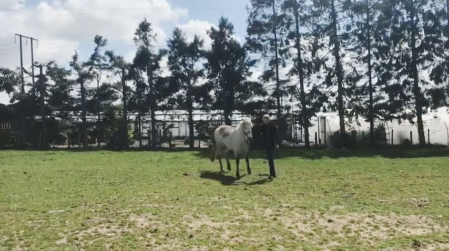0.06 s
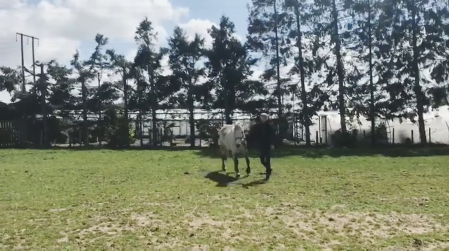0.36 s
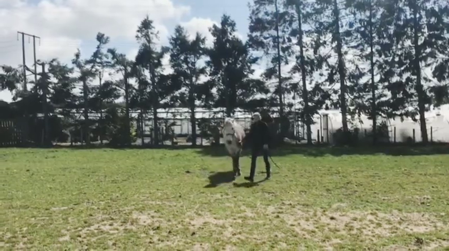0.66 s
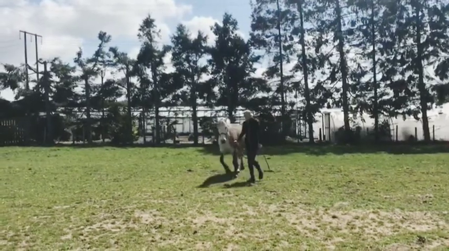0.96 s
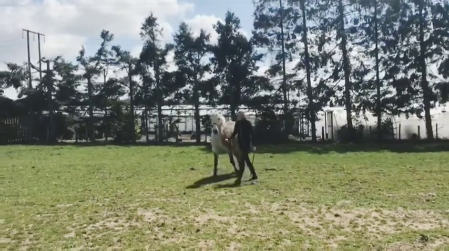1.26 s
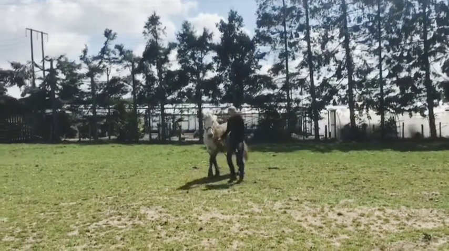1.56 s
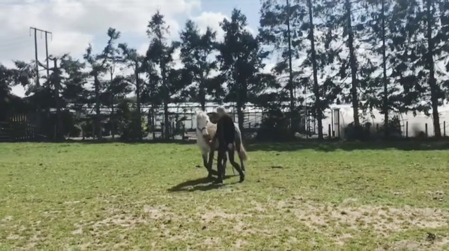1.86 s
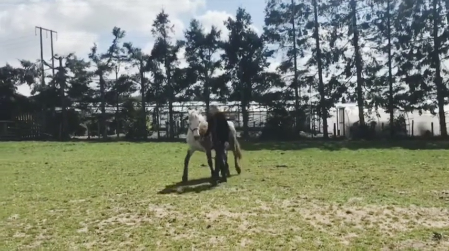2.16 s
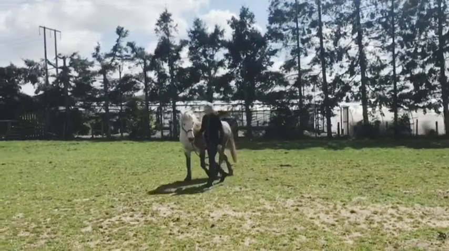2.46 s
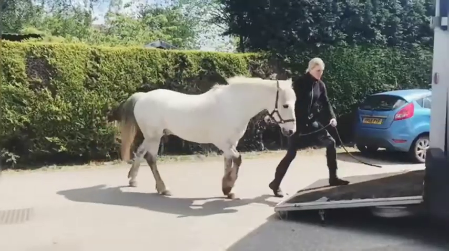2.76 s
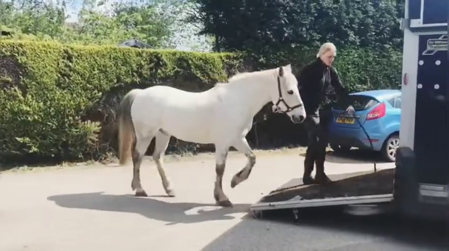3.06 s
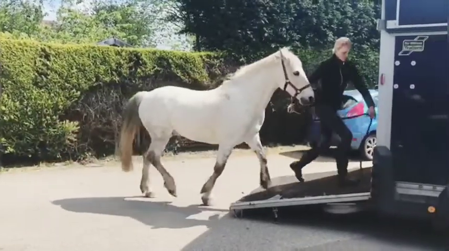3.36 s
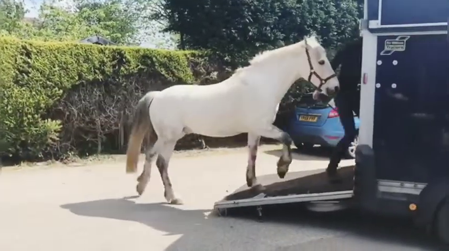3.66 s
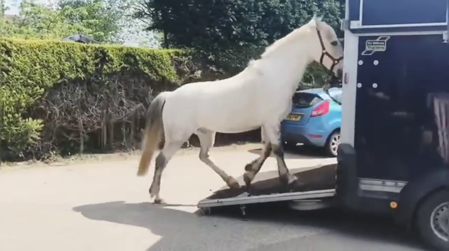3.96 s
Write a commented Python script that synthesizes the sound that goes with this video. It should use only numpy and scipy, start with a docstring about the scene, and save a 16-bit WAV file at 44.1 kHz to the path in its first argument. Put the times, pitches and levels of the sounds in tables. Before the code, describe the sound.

A horse's hooves clop across a hard yard, then thud loudly onto a hollow, rattling trailer ramp near the microphone while small birds chirp. Before that, a finch sings over a quiet field and a distant animal hoots faintly.

```python
"""A finch sings over a quiet field while an animal hoots far off; a first soft footfall sounds. After a brief
gap the scene changes: the microphone stands in a yard with two more songbirds. A led horse clops over hard
ground, then sets its front hooves on a trailer ramp. Each blow rings the ramp's panel, makes the box behind it
boom and sets hinges and fittings rattling."""
import sys
import numpy as np
from scipy import signal
from scipy.fft import rfft, irfft
from scipy.io import wavfile
from scipy.ndimage import uniform_filter1d

SR = 44100
rng = np.random.default_rng(int(sys.argv[2]) if len(sys.argv) > 2 else 0)


def inscribe(sig):
    """Save sig as 16-bit PCM at rate SR to the path in sys.argv[1].

    A 1-D sig is mono; a 2-D sig holds one channel per row.
    Samples are clipped to [-1, 1] before scaling.
    """
    pcm = np.round(np.clip(np.atleast_2d(sig).T, -1, 1) * 32767)
    wavfile.write(sys.argv[1], SR, pcm.astype(np.int16))


N = 176400
T = np.arange(N) / SR
RING_T = T[:SR]  # one second for a blow to die away

# Noisy decays. Each row: frequency in Hz, relative level in dB, t60 in seconds.
CRACK = [(300, 4.5, 0.025), (1510, 10.5, 0.03), (2350, -6.5, 0.071), (3960, 0.5, 0.046), (7400, -14, 0.021),
         (11700, -25.5, .025)]  # a hard hit on the ramp or its fittings
TRAILER = [(99, 8, 0.25), (250, -7.5, 0.58), (448, -0.5, 0.7), (1290, -2.5, 0.32), (4520, 3.5, 0.29)]  # reverberation inside the trailer
TREES = [(400, 7, 0.13), (2480, 3, 0.75), (4100, -2.5, 0.65), (8700, 5.5, 0.56)]  # reflections from the trees


def ramp(crunch_db=4, thump_t60_s=0.037):
    """Each step flexes the ramp with a thump and rings the panel and the box; the trailer reverberates."""
    # Each row: start in seconds, levels of boom, panel, crack and thump in dB, thump pitch in Hz.
    blows = [(2.779, -55, -46, -41.5, -24.5, 127), (2.826, -37, -52, -62, -30, 71.6),
             (3.349, -18, -18, -24, -14.5, 232), (3.389, -40, -17.5, -24.5, -7, 254),
             (3.882, -46, -28.5, -24.5, -30, 298), (3.886, -24.5, -22.5, -39, -22, 261),
             (3.898, -16, -19.5, -16.5, -14, 258), (3.922, -22, -18, -42, -22, 188),
             (3.973, -20, -29, -44, -15, 161)]
    # Modes of the ramp and the trailer's box. Each row: frequency in Hz, level in dB, t60 in seconds.
    panel_modes = [(137.3, -9.5, 0.26), (170.4, -8.5, 0.16), (199.7, -4.5, 0.18), (224.4, 1, 0.18),
                   (251, -2, 0.19), (289, -12, 0.29), (346.6, -10, 0.14), (581, -17, 0.3)]
    box_modes = [(50.17, -11.5, 1), (56.6, -5.5, 0.9), (78.7, -14, 1), (126.7, -13.5, 0.91)]
    hits, low = np.zeros(N), np.zeros(N)
    for start, boom_db, panel_db, crack_db, thump_db, thump_hz in blows:
        boom = amp(boom_db) * ring(box_modes, scatter=0.0079)
        thump = ring([(thump_hz, thump_db, thump_t60_s)])
        add(low, start, (boom + thump) * loading(rise_s=0.0057))
        panel = amp(panel_db) * ring(panel_modes) * loading(rise_s=0.0036)
        crack = amp(crack_db) * decay(CRACK) * amp(crunch_db * walk(730, SR))
        add(hits, start, panel + crack)
    return low + echo(hits, TRAILER, wet_db=-2)


def fittings(width_octaves=0.59, knock_t60_s=0.021, board_db=-20.5, board_t60_s=0.15, crack_db=-13.5):
    """Loose hinges and fittings knock; every knock rings the boards in its own mix of modes."""
    # Each row: start in seconds, level in dB, centre of the knock in Hz.
    rattles = [(3.351, -16, 930), (3.368, -18.5, 1150), (3.391, -19, 790), (3.404, -18, 1390),
               (3.413, -25, 1140), (3.424, -18.5, 1290), (3.437, -18.5, 1390), (3.456, -24, 1350),
               (3.887, -12, 980), (3.894, -18, 1050), (3.9124, -15, 1370), (3.918, -16.5, 1460),
               (3.930, -17, 1190), (3.948, -19.5, 1240), (3.956, -21, 930)]
    # The boards' mode frequencies in Hz.
    board_modes = [616, 649, 765, 1030, 1155, 1300, 1465, 1630, 1736, 1870]
    out, octave = np.zeros(N), log_hz(SR)
    for start, db, centre_hz in rattles:
        band = np.exp(-((octave - np.log2(centre_hz)) / width_octaves) ** 2)
        knock = irfft(rfft(rng.standard_normal(SR)) * band, SR)
        knock = knock / knock.std() * fade(knock_t60_s)
        wood = sum(rng.standard_normal() * ring([(hz, board_db, board_t60_s)], scatter=.004)
                   for hz in board_modes)
        add(out, start, amp(db) * (knock + wood + amp(crack_db) * decay(CRACK)))
    return echo(out, TRAILER, wet_db=-8.5)


def ground_steps(grain_db=4, crunch_db=4, hollow_low_hz=600):
    """Each contact crunches, rings the hollow hoof and thuds; dragged feet grind grit; the yard echoes."""
    # Hooves and boots. Each row: start in seconds, hollow pitch in Hz, clop, crack and thud in dB.
    contacts = [(2.34, 712, -36.5, -56.5, -50), (2.599, 912, -25, -36.5, -29),
                (2.777, 1804, -39, -44, -31.5), (2.882, 656, -40.5, -51, -63),
                (2.975, 835, -29.5, -24, -26.5), (2.98, 860, -29, -23, -64), (2.996, 716, -17, -14.5, -29),
                (3.005, 753, -14, -33, -40), (3.588, 752, -27, -46, -34), (3.718, 649.4, -17.5, -56, -31.5)]
    # The hoof capsule's modes. Each row: ratio to the hollow pitch, level in dB, t60 in seconds.
    hoof_modes = [(1, 0, 0.034), (1.2, -8.5, .03), (1.48, -10, .025), (2.1, -20, 0.045)]
    # Struck ground and the yard's echo. Each row: frequency in Hz, relative level in dB, t60 in seconds.
    crack_bands = [(455, -12, 0.031), (830, 1, 0.03), (1700, 6.5, 0.026), (2740, -6, 0.026),
                   (4250, 1.5, 0.028), (7700, -5.5, 0.032), (10900, -19.5, 0.026)]
    thud_bands = [(50, -3, 0.06), (129.8, -4, 0.17), (281, 10.5, 0.042), (440, -12.5, 0.1),
                  (1500, -30.5, 0.037)]
    yard_echo = [(151, -2.5, 0.53), (442, 3, 0.41), (870, 5, 0.28), (4940, -4.5, 0.29)]
    # Dragged feet. Each row: start in seconds, length in seconds, level in dB.
    scuffs = [(2.68, 0.046, -53.5), (3.276, 0.062, -37), (3.338, 0.11, -31), (3.708, 0.066, -36.5)]
    # Grinding grit. Each row: frequency in Hz, relative level in dB.
    grit_colour = [(450, -1), (900, 2.5), (2500, -11.5), (7500, -23), (11500, -35)]
    ground, clops = np.zeros(N), np.zeros(N)
    for start, hz, clop_db, crack_db, thud_db in contacts:
        add(clops, start, amp(clop_db) * ring([(hz * ratio, db, t60) for ratio, db, t60 in hoof_modes]))
        crack = amp(crack_db) * decay(crack_bands) * amp(crunch_db * walk(760, SR))
        thud = amp(thud_db) * decay(thud_bands)
        add(ground, start, loading(rise_s=0.002) * (crack + thud))
    for start, length, db in scuffs:
        drag = loading(rise_s=0.0053) * np.exp(-2 * (RING_T / length) ** 2)
        grit = noise(grit_colour, SR) * amp(grain_db * walk(574, SR))
        add(ground, start, amp(db) * drag * grit)
    clops = signal.sosfilt(signal.butter(3, hollow_low_hz, "high", fs=SR, output="sos"), clops)
    return echo(ground, yard_echo, wet_db=-9) + echo(clops, yard_echo, wet_db=-17)


def finch(clear=0.027, trilled=0.045, buzzy=0.11):
    """Slurs, a trill, an arched note and a buzzy ending whose last low note lingers in the trees."""
    # Syllable shapes. Each row: time in milliseconds, pitch in Hz, relative level in dB.
    slur = [(0, 7200, -24.5), (18.17, 6000, -6), (30.3, 5400, -16), (31.7, 3900, -30), (34.8, 2950, -15),
            (46.7, 3150, -12.5), (52, 3600, 6.5), (58.7, 5200, -20), (73.3, 4100, 3.5), (83.1, 3160, -10.5)]
    trill = [(0, 4700, -12), (6.8, 4400, -9), (11.96, 3500, -7), (19.97, 6300, -15), (26.6, 3400, -8),
             (30.77, 3710, 2), (37.6, 2650, -16.5), (44.8, 2800, -12), (51.7, 3030, -20)]
    arch = [(0, 2600, -19), (20.3, 3350, -6), (35.4, 3650, -2), (50.6, 3640, -4.5), (65.9, 3000, -5.5),
            (86, 2500, -21)]
    flick = [(0, 7500, -10), (5.04, 5600, -7.5), (12.1, 6700, -19), (19.8, 5800, -7), (37.8, 4100, -8),
             (42.3, 2900, -15)]
    rasp = [(0, 3600, -12.5), (24.8, 4100, -1.5), (53.4, 4100, -2.5)]
    fall = [(0, 2900, -17), (8.3, 3700, -1), (22.3, 3400, -3.5), (33.1, 3050, -2), (42, 2700, -18)]
    low_note = [(0, 2600, -0.18), (42.3, 2280, -2)]
    # When each shape is sung. Each row: start in seconds, level in dB.
    slurs = [(-.074, -40), (0.086, -41.5), (0.248, -39.5)]
    trills = [(.417, -36), (.505, -35.5), (0.593, -39), (0.686, -39.5), (.775, -38.5), (.863, -38.5),
              (.950, -39), (1.039, -39), (1.130, -39.5)]
    arches = [(1.241, -30)]
    flicks = [(1.426, -41), (1.514, -41.5), (1.602, -39.5)]
    rasps = [(1.70, -44)]
    falls = [(1.755, -42)]
    low_notes = [(1.796, -61)]
    song = sing(slur, slurs, warble=clear)
    song += sing(trill, trills, warble=trilled, sag_per_s=0.0357)
    song += sing(flick, flicks, warble=buzzy, blur_db=-3)
    song += sing(rasp, rasps, warble=buzzy)
    song += sing(fall, falls, warble=trilled)
    arched = sing(arch, arches, warble=0.011, blur_db=-16)
    song = echo(song, TREES, wet_db=-2.5) + echo(arched, TREES, wet_db=-11)
    return song + echo(sing(low_note, low_notes, warble=trilled), TREES, wet_db=9)


def hedge_birds():
    """One bird twitters into a sinking whistle; another repeats a double chip; a thin note sounds high."""
    # Syllable shapes. Each row: time in milliseconds, pitch in Hz, relative level in dB.
    twitter = [(0, 5000, -3.5), (12.84, 3400, -11), (20.8, 5400, -1.5), (30, 3200, -13), (42.2, 4700, -1),
               (48, 5200, -9), (59.2, 4300, -10)]
    whistle = [(0, 4660, -18), (15, 4630, -6), (32, 4570, 0), (58, 4470, -8), (68, 4420, -24)]
    chip = [(0, 3400, -12), (7.94, 3750, -2.5), (17.3, 3250, -13), (28.3, 3800, -0.5), (36.06, 3400, -6),
            (46.15, 2850, -8.5), (67.5, 1900, -36), (85.3, 2550, -10.5), (95.7, 2900, -6.5),
            (101.5, 2970, -2), (110.4, 2880, -26)]
    thin_note = [(0, 7500, -2), (115, 7280, -2)]
    # When each shape is sung. Each row: start in seconds, level in dB.
    twitters = [(2.528, -49), (2.728, -44.5), (2.92, -41.5)]
    whistles = [(2.593, -41), (2.786, -36), (2.981, -41.5)]
    chips = [(3.096, -37.5), (3.243, -40), (3.53, -38.5), (3.675, -38), (3.825, -36.5)]
    thin_notes = [(3.124, -62)]
    song = sing(twitter, twitters, warble=0.06, blur_db=1)
    song += sing(whistle, whistles, warble=0.004, blur_db=-15, scatter=0.0021)
    song += sing(chip, chips, warble=0.027, blur_db=-5.5)
    song += sing(thin_note, thin_notes, warble=0.027)
    return echo(song, TREES, wet_db=-4)


def sing(shape, syllables, warble, sag_per_s=0, blur_db=-7, scatter=0.01247, flutter_db=2, blur_s=.012):
    """A fluttering tone repeats a syllable, never quite alike; deep warble makes it rasp."""
    ms, hz, db = np.array(shape).T
    at, out = ms / 1000, np.zeros(N)
    t = T[:int(at[-1] * SR)]
    for start, level_db in syllables:
        waver = warble * walk(1100, len(t))
        detune = scatter * rng.standard_normal() - sag_per_s * (start - syllables[0][0])
        pitch = np.interp(t, at, hz) * (1 + waver + detune)
        loudness = amp(level_db + np.interp(t, at, db) + flutter_db * walk(326.6, len(t)))
        note = loudness * signal.windows.tukey(len(t), .06) * np.sin(2 * np.pi * np.cumsum(pitch) / SR)
        leaves = rng.standard_normal(SR) * np.exp(-RING_T / blur_s)  # nearby leaves blur the note
        add(out, start, note)
        add(out, start, amp(blur_db) * signal.fftconvolve(note, leaves / np.linalg.norm(leaves)))
    return out


def far_animal(bend=0.0516, waver=0.035):
    """Soft hoots from beyond the field; each swells, arches in pitch and wavers."""
    # Each row: start and length in seconds, first and last pitch in Hz before the bend, level in dB.
    hoots = [(.43, 0.32, 486.4, 566, -58), (1.10, 0.53, 519, 519.6, -55.5), (1.83, 0.255, 498, 446, -60.5)]
    out = np.zeros(N)
    for start, length, from_hz, to_hz, db in hoots:
        n = int(length * SR)
        swell = signal.windows.tukey(n, .35)
        pitch = np.linspace(from_hz, to_hz, n) * (1 - bend * (1 - swell) + waver * walk(70, n))
        add(out, start, amp(db) * swell * np.sin(2 * np.pi * np.cumsum(pitch) / SR))
    return echo(out, TREES, wet_db=-2.5)


def distant_rush():
    """A faint midrange rush rises and sinks far across the field."""
    # Each row: frequency in Hz, relative level in dB.
    rush_colour = [(200, -25), (600, -5), (1200, -3.5), (2200, -15.5), (8000, -28)]
    # Each row: time in seconds, level in dB.
    rush_levels = [(0, -67.5), (.7, -65), (1.4, -66), (2.4, -72.5)]
    return noise(rush_colour, N) * amp(np.interp(T, *np.array(rush_levels).T))


def air(colour, db, swell_db=0.5):
    """Gently swelling outdoor background."""
    return noise(colour, N) * amp(db - swell_db * walk(19, N))


def amp(db):
    """Decibels to gain."""
    return 10 ** (np.asarray(db) / 20)


def add(track, start, sound):
    """Mix a sound into a track at a time in seconds."""
    i = int(round(start * SR))
    sound, i = sound[max(-i, 0):], max(i, 0)
    track[i:i + len(sound)] += sound[:max(N - i, 0)]


def log_hz(size):
    """Octave position of each spectral bin."""
    return np.log2(np.maximum(np.fft.rfftfreq(size, 1 / SR), 1))


def noise(colour, size):
    """Noise of unit level, coloured by rows of frequency in Hz and level in dB."""
    hz, db = np.array(colour).T[:2]
    gain = amp(np.interp(log_hz(size), np.log2(hz), db))
    x = irfft(rfft(rng.standard_normal(size)) * gain, size)
    return x / x.std()


def walk(rate_hz, size):
    """Smooth random wandering with a spread near one."""
    steps = rng.standard_normal(4096)
    return np.interp(T[:size] * rate_hz, np.arange(len(steps)), steps)


def loading(rise_s):
    """Weight comes onto a foot over a few milliseconds."""
    return np.minimum(RING_T / rise_s, 1)


def fade(t60):
    """Exponential die-away, 60 dB down after t60 seconds."""
    return np.exp(-np.log(1000) * RING_T / t60)


def decay(bands):
    """A noise burst in which each band dies at its own rate."""
    hz, _, t60s = np.array(bands).T
    spectrum, octave = rfft(noise(bands, SR)), log_hz(SR)
    shares = [np.interp(octave, np.log2(hz), peak) for peak in np.eye(len(hz))]
    return sum(irfft(spectrum * share, SR) * fade(t60) for share, t60 in zip(shares, t60s))


def ring(modes, scatter=0.0198):
    """Damped modes, slightly detuned by where the blow lands."""
    out = np.zeros(SR)
    for hz, db, t60 in modes:
        pitch = hz * (1 + scatter * rng.standard_normal())
        out += amp(db) * fade(t60) * np.sin(2 * np.pi * pitch * RING_T)
    return out


def echo(x, space, wet_db, build_s=0.0019):
    """A sound plus the diffuse reflections of a space."""
    tail = decay(space) * (1 - np.exp(-RING_T / build_s))
    return x + amp(wet_db) * signal.fftconvolve(x, tail / np.linalg.norm(tail))[:N]


def scene(field_ends_s=2.432, yard_starts_s=2.476):
    """The field, then, after a brief gap, the scene changes to the yard."""
    # The open air at each place. Each row: frequency in Hz, relative level in dB.
    field_air = [(15, -29), (25, -2), (59, 5), (101, 4), (331, -12), (600, -8.5), (2680, -30),
                 (11100, -34.5), (15600, -69)]
    yard_air = [(25, -3), (90, 8), (250, -7), (480, -15.5), (1100, -9.5), (2000, -19), (3500, -19.5),
                (7500, -28.5), (12000, -33)]
    steps = ground_steps()
    field = distant_rush() + finch() + far_animal() + air(field_air, db=-57) + steps
    yard = hedge_birds() + air(yard_air, db=-53.5) + steps + ramp() + fittings()
    in_field = uniform_filter1d((T < field_ends_s).astype(float), size=64)
    in_yard = uniform_filter1d((T > yard_starts_s).astype(float), size=64)
    return (field * in_field + yard * in_yard + air(field_air, db=-98))[None]


def record(dry, bottom_hz=36, top_hz=11700):
    """The microphone drops the deepest bass and the top."""
    dry = signal.sosfilt(signal.butter(3, bottom_hz, "high", fs=SR, output="sos"), dry)
    return signal.sosfilt(signal.ellip(8, .2, 70, top_hz, fs=SR, output="sos"), dry)


dry = scene()
out = record(dry)
inscribe(out)
```